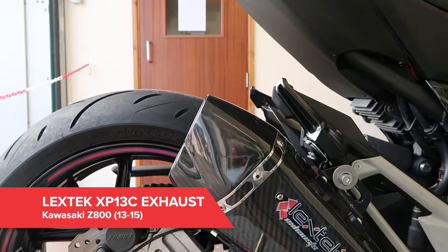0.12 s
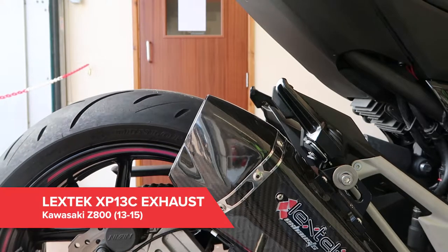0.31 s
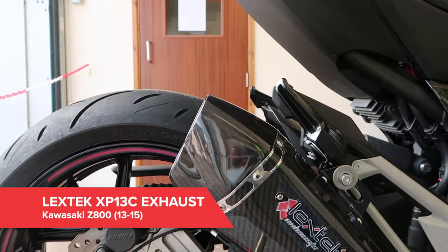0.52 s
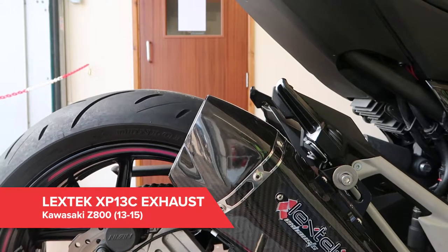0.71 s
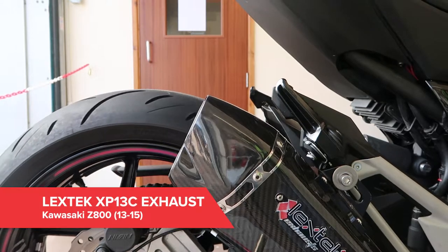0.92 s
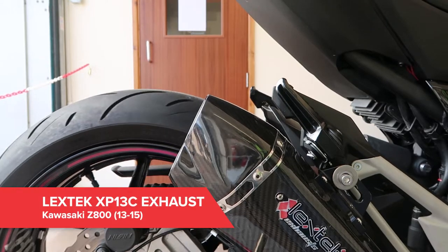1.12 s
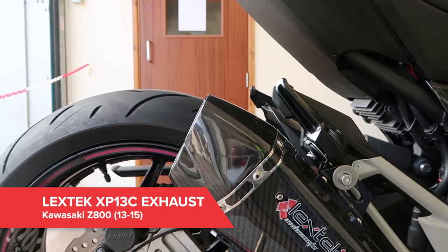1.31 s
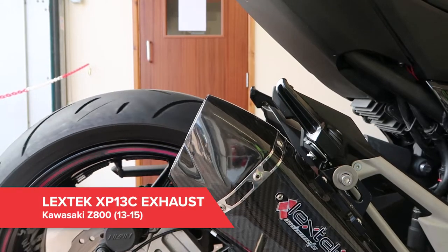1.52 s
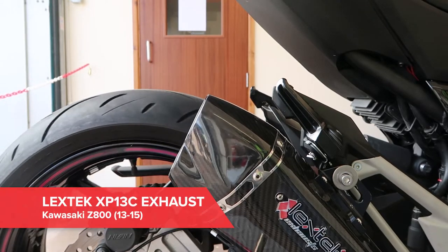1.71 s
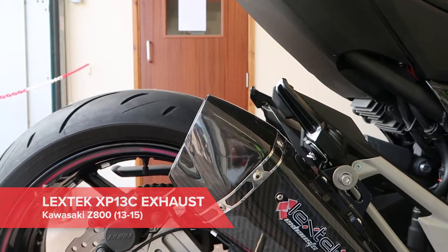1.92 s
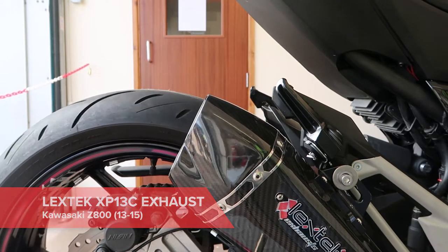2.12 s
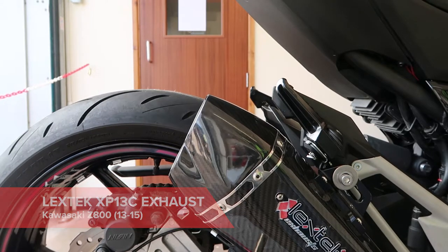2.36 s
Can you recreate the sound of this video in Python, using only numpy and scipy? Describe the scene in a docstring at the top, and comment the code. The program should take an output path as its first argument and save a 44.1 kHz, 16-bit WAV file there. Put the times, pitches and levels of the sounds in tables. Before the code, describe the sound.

A motorcycle engine idles with low, lumpy exhaust thumps in a workshop, then one quick blip cracks loudly, leaps to a raspy howl and glides back down to uneven idle, miked close to the silencer.

```python
"""A four-cylinder motorcycle lopes at idle in a workshop, heard close to its silencer, then gets one sharp blip.
Separate exhaust thumps are filtered impulses, one per firing; they swell, overload the microphone with bright
cracks (single filtered impulses) and merge into a note of harmonics and half orders. Impulses ringing resonances
make the burble, rasp, edge and shell ring; pulsing filtered noise is the rush of gas.
The throttle shuts and the note sinks smoothly back to an uneven idle, with one faint late knock."""
import sys
import numpy as np
from scipy import signal
from scipy.fft import rfft, irfft, next_fast_len
from scipy.io import wavfile

SR = 44100
rng = np.random.default_rng(int(sys.argv[2]) if len(sys.argv) > 2 else 0)


def output_pcm(signal):
    """Save a mono or channel-first signal as 16-bit PCM at the path in sys.argv[1].

    Samples are clipped to [-1, 1] before scaling.
    """
    pcm = np.clip(np.atleast_2d(signal).T, -1, 1) * 32767
    wavfile.write(sys.argv[1], SR, np.round(pcm).astype(np.int16))


N = 112455
TIME = np.arange(N) / SR
SIZE = next_fast_len(N + SR) // 2 * 2
HZ = np.maximum(np.arange(SIZE // 2 + 1) * SR / SIZE, 1)

# Layer levels are set before trims, scatter and room; colours are relative levels.
# engine speed as firing rate: [t/s, f/Hz]
SPEED = [(0.0, 53.09), (0.06, 53.22), (0.13, 45.12), (0.26, 51.36), (0.33, 43.31), (0.42, 48.79),
         (0.51, 44.87), (0.575, 45.47), (0.63, 70.27), (0.7, 115.58), (0.776, 199.08), (0.834, 262.13),
         (0.9, 331.17), (0.94, 356.16), (0.985, 368.28), (1.08, 335.31), (1.168, 308.39), (1.358, 256.41),
         (1.584, 200.2), (1.688, 174.11), (1.83, 145.08), (1.956, 120.06), (2.1, 96.03), (2.26, 80.57),
         (2.4, 63.72), (2.55, 53.41)]
# relative strength of the four cylinders, in firing order: [level/dB]
CYLINDER_DB = np.array([0.53, 0.44, 0.94, 0.021])

# strength of the exhaust thumps: [t/s, level/dB]
THUMP_LEVEL = [(0, -23), (.13, -27), (.33, -24), (.5, -20), (.585, -10), (.603, -4), (.62, -.5), (.66, -1),
               (.69, -4), (.715, -9), (.75, -15), (.82, -29), (.95, -34), (1, -27), (1.05, -48), (1.5, -52),
               (1.9, -40), (2.06, -29), (2.15, -23), (2.3, -24), (2.55, -23)]
# at idle the engine catches in runs of strong firings: [start t/s, length t/s, level/dB]
SURGES = [(.03, .054, -12.5), (.172, .118, -14), (.362, .1, -12.5), (.533, .06, -11), (2.128, .034, -11),
          (2.186, .012, -14), (2.222, .012, -9), (2.246, .024, -12.5), (2.338, .014, -16),
          (2.412, .048, -14.5), (2.514, .034, -15)]
# tone of the thumps: [f/Hz, level/dB]
THUMP_COLOUR = [(20, -36.5), (36, -15), (50, -6.5), (72, -11.5), (100, -6.5), (125, 4), (160, -4),
                (200, 2.5), (300, 6.5), (420, 5.5), (550, -4.5), (750, -30.5), (1000, -28), (1300, -59),
                (2500, -58.5), (8000, -92)]
THUMP_SCATTER_DB, THUMP_ROOM_DB = 1.5, -5
THUMP_LEAD_S, ECHO_S, ECHO_DB = .001, .0072, -11

# note at the firing rate: [t/s, rms level/dB]
FIRING_TONE = [(.62, -50), (.72, -29), (.79, -19), (.84, -21), (.9, -15), (.94, -18), (.965, -28), (1, -17),
               (1.03, -22), (1.08, -15), (1.11, -20), (1.15, -14.5), (1.24, -20), (1.3, -15), (1.35, -12),
               (1.41, -23), (1.46, -19), (1.51, -15), (1.61, -15), (1.69, -25), (1.74, -21), (1.8, -32),
               (1.85, -25), (1.95, -23.5), (2.05, -31), (2.15, -50)]
# its octave: [t/s, rms level/dB]
OCTAVE_TONE = [(.64, -42), (.7, -27), (.76, -21), (.805, -13), (.88, -22), (.96, -18), (1.02, -26),
               (1.08, -37), (1.14, -31), (1.2, -22), (1.27, -22), (1.35, -28), (1.43, -16), (1.48, -25),
               (1.55, -23), (1.6, -32), (1.645, -20), (1.71, -29), (1.79, -27), (1.85, -39), (1.9, -30),
               (1.97, -36), (2.03, -30), (2.2, -33), (2.26, -50)]
# third harmonic, singing out under throttle: [t/s, rms level/dB]
THIRD_TONE = [(.638, -38), (.68, -24), (.73, -19), (.765, -33), (.82, -21), (.87, -25), (.94, -24),
              (1, -50), (1.22, -48), (1.39, -30), (1.46, -31), (1.5, -42), (1.6, -28), (1.72, -29),
              (1.85, -35), (1.93, -48), (2.03, -30), (2.1, -37), (2.15, -23), (2.21, -28), (2.27, -46)]
# tones between the harmonics, from unequal cylinders: [multiple of the firing rate, level/dB]
HALF_ORDERS = [(.5, -15), (1.5, -9), (2.5, -10.5), (3.5, -17)]
# their shared swell: [t/s, rms level/dB]
HALF_LEVEL = [(.66, -36), (.8, -29), (.95, -28), (1.05, -31), (1.2, -25), (1.35, -27), (1.46, -25),
              (1.55, -22), (1.65, -26), (1.87, -23), (2.1, -39)]
# the silencer radiates the half orders poorly in the bass: [f/Hz, level/dB]
RADIATION = [(80, -45), (105, -14), (125, -6), (180, -7), (245, -6), (300, 6), (600, 6), (1000, 1)]
TONE_WAVER_DB, HALF_WAVER_DB, WAVERS_PER_S = 1, 3.5, 13.06
TREMBLE_DB, TREMBLE_CYCLES, TREMBLES_PER_S = .7, .013, 90
NOTE_LAG_CYCLES, NOTE_ROOM_DB, HALF_ROOM_DB = 0.19, -16, -0.5

# hollow burble of the silencer filling the room: [t/s, level/dB]
BURBLE_LEVEL = [(0, -34.5), (.13, -43.5), (.25, -36.5), (.35, -43), (.48, -35.5), (.57, -38.5),
                (.68, -20.5), (.78, -23), (.9, -33.5), (1, -41), (1.3, -33.5), (1.6, -39.5), (1.85, -32),
                (2.05, -30), (2.15, -28.5), (2.19, -35), (2.26, -31.5), (2.37, -39), (2.44, -34.5),
                (2.55, -41.5)]
# tone of the burble: [f/Hz, level/dB]
BURBLE_COLOUR = [(90, -25.5), (150, -10.5), (210, 1.5), (270, 3), (330, -0.5), (420, 0), (500, -5),
                 (600, -10), (750, -18.5), (1200, -48), (4000, -85.5)]
BURBLE_DB, BURBLE_SCATTER_DB, BURBLE_ROOM_DB = 0, 3.2, 3

# rasping overtones: [t/s, rms level/dB]
RASP_LEVEL = [(0, -51), (.15, -55), (.45, -44.5), (.57, -49.5), (.65, -22.5), (.72, -18), (.8, -16),
              (.94, -24.5), (1.02, -61.5), (1.1, -42), (1.18, -28), (1.3, -29.5), (1.55, -32), (1.78, -37),
              (1.95, -32.5), (2.08, -53), (2.15, -37), (2.27, -72), (2.36, -49.5), (2.55, -60.5)]
# tone of the rasp: [f/Hz, level/dB]
RASP_COLOUR = [(200, -66.5), (400, -17), (560, 7), (640, 5.5), (770, 15), (900, -5), (1060, 7.5),
               (1200, -25.5), (1600, -11), (3000, -48.5), (8000, -76.5)]
RASP_DB, RASP_SCATTER_DB, RASP_ROOM_DB, RASP_JITTER_S = -2.5, 2.8, -4, .00003

# metallic edge of the rasp: [t/s, rms level/dB]
EDGE_LEVEL = [(0, -63.5), (.58, -53.5), (.66, -43), (0.729, -32), (.8, -18.5), (.9, -23.5), (0.962, -29),
              (1.031, -89), (1.131, -39.5), (1.269, -34.5), (1.399, -40.5), (1.562, -38.5), (1.75, -49),
              (1.95, -55), (2.1, -72), (2.55, -73.5)]
# tone of the edge: [f/Hz, level/dB]
EDGE_COLOUR = [(600, -61.5), (1150, -14), (1350, 13.5), (1470, 3.5), (1580, 14.5), (1700, 7), (1830, 4.5),
               (2050, -2.5), (2300, -1), (2700, -18), (2930, 1), (3300, -8), (3700, -55.5), (3950, -15.5),
               (4500, -15), (7000, -35.5), (9000, -75.5)]
EDGE_DB, EDGE_SCATTER_DB = -6.5, 3.3

# narrow metallic ring of the silencer's shell: [t/s, level/dB]
RING_LEVEL = [(.55, -72.5), (.62, -57.5), (.72, -44.5), (.8, -37.5), (.94, -42.5), (1.04, -65), (1.13, -60),
              (1.2, -44), (1.35, -47), (1.6, -56.5), (1.85, -62), (2.1, -72.5)]
# tone of the ring: [f/Hz, level/dB]
RING_COLOUR = [(2000, -52.5), (2780, -18), (2880, 1), (2940, -2.5), (3050, -7.5), (3160, -16), (3700, -31),
               (3950, -13), (4200, -33.5), (6000, -59.5)]
RING_DB = 0

# continuous gas hiss: [t/s, rms level/dB]
HISS_LEVEL = [(0, -59.5), (.3, -58.5), (.55, -57), (.65, -43.5), (.8, -71.5), (0.999, -40), (1.1, -42),
              (1.319, -37), (1.46, -43), (1.559, -41.5), (1.82, -52), (1.9, -49.5), (2.05, -56.5),
              (2.25, -57.5), (2.55, -60)]
# tone of the hiss: [f/Hz, level/dB]
HISS_COLOUR = [(300, -8), (800, 3.5), (1200, 4), (1550, 2), (1950, -0.5), (2750, -2), (2930, -4),
               (3150, -4.5), (3600, -3), (3950, -2), (4300, -5), (5000, -5.5), (6200, -11.5), (7200, -19),
               (8000, -27), (10000, -42), (15000, -61)]
# gas blast under throttle: [t/s, rms level/dB]
BLAST_LEVEL = [(0.6, -83.5), (.7, -48), (0.798, -35.5), (0.881, -29.5), (0.941, -29), (0.999, -42.5),
               (1.059, -70.5)]
# tone of the blast: [f/Hz, level/dB]
BLAST_COLOUR = [(500, -16), (1000, 21.5), (1600, 2.5), (2100, 4.5), (2700, 6), (2930, 3.5), (3300, 9),
                (4500, 4.5), (5500, -1.5), (7200, -5.5), (7900, -34.5), (10000, -56.5), (15000, -69)]
# thin treble sizzle while the engine coasts: [t/s, rms level/dB]
SIZZLE_LEVEL = [(.6, -102), (.95, -70), (1.1, -64), (1.4, -66), (1.62, -59), (1.8, -82.5), (2.05, -102)]
# tone of the sizzle: [f/Hz, level/dB]
SIZZLE_COLOUR = [(4000, -38), (7000, 1), (8500, -3.5), (9700, -7.5), (11000, -23), (15000, -16.5)]
HISS_DB, BLAST_DB = -2.5, -1
HISS_PULSING = 0.13  # share of the jet's amplitude, ahead of its filter

# bright cracks as the loudest thumps overload the microphone, and one faint late knock: [t/s, level/dB]
CRACKS = [(.6348, -13), (.659, -6), (.6978, -16), (2.228, -25)]
# tone of the cracks and the knock: [f/Hz, level/dB]
CRACK_COLOUR = [(80, 3.5), (300, 0), (700, 0.5), (1100, -4), (1600, -11.5), (2500, -22.5), (4000, -32.5),
                (6000, -48), (11000, -55.5), (15000, -73.5)]
CRACK_ROOM_DB = -15

# stereo width, side against mid: [f/Hz, level/dB]
WIDTH = [(100, -55), (300, -35), (500, -25), (750, -16), (1000, -4), (1500, -2), (2000, 4.91), (2700, 6.72),
         (3000, 0.91), (3600, 6.7), (4400, 10.83), (5200, 3.87), (7000, 3.74), (9000, 12.83), (15000, 20)]
# share of the side's power that follows the mid: [f/Hz, share 0-1]
DIRECT_SHARE = [(500, 0.23), (1500, 0.92), (2300, 0.16), (5000, .1)]
SIDE_LAG_RAD, SPREAD_S = 0.57, 0.0059

ROOM_T60_S, ROOM_DELAY_S = 0.51, 0.0022
OVERLOAD = 1  # amplitude, full scale
CUTOFF_HZ = 15700


def from_db(db):
    """Decibels to gain."""
    return 10 ** (np.asarray(db) / 20)


def rms_one(x):
    """Scale to unit power."""
    return x / np.sqrt(np.mean(x ** 2) + 1e-20)


def in_time(rows, s=TIME):
    """Read a curve at the given times."""
    return np.interp(s, *np.transpose(rows))


def at_hz(rows, at=HZ):
    """Read a spectrum on a log-frequency axis."""
    hz, value = np.transpose(rows)
    return np.interp(np.log(at), np.log(hz), value)


def drift(rate):
    """Random wander between normal draws, at rate draws a second."""
    knots = rng.standard_normal(400)
    return np.interp(TIME * rate, np.arange(len(knots)), knots)


def response(colour):
    """Causal (minimum-phase) impulse response with this colour, peak 1."""
    cepstrum = irfft(np.log(from_db(at_hz(colour))))
    # folding the cepstrum forward in time gives minimum phase
    cepstrum[1:SIZE // 2] *= 2
    cepstrum[SIZE // 2 + 1:] = 0
    h = irfft(np.exp(rfft(cepstrum)))[:SR // 10]
    return h / np.abs(h).max()


def through(x, h):
    """Filter by an impulse response."""
    return signal.fftconvolve(x, h)[:N]


def workshop(x, room_db):
    """The walls return a diffuse tail: exponentially decaying noise after a short delay."""
    decay = from_db(-60 * TIME / ROOM_T60_S)
    tail = rng.standard_normal(N) * decay * (TIME > ROOM_DELAY_S)
    tail /= np.sqrt(np.sum(tail ** 2))
    return x + from_db(room_db) * through(x, tail)


def widen(mid):
    """The bass is central and the treble is spread wide, partly out of phase."""
    scatter = rfft(rng.standard_normal(N) * np.exp(-TIME / SPREAD_S), SIZE)
    scatter /= np.sqrt(np.mean(np.abs(scatter) ** 2))
    share = np.clip(at_hz(DIRECT_SHARE), 0, 1)
    direct = np.sqrt(share) * np.exp(-1j * SIDE_LAG_RAD)
    spread = direct + np.sqrt(1 - share) * scatter
    side = irfft(rfft(mid, SIZE) * from_db(at_hz(WIDTH)) * spread)[:N]
    return np.array([mid + side, mid - side])


def jet(phase, level, colour, gain_db):
    """Turbulent gas: noise pulsing with each firing, then coloured."""
    pulsing = 1 + HISS_PULSING * np.cos(2 * np.pi * phase)
    turbulence = rng.standard_normal(N) * pulsing
    return from_db(in_time(level) + gain_db) * rms_one(through(turbulence, response(colour)))


def gas(phase):
    """Continuous hiss, the blast under throttle and the thin sizzle, each a turbulent jet."""
    hiss = jet(phase, HISS_LEVEL, HISS_COLOUR, HISS_DB)
    blast = jet(phase, BLAST_LEVEL, BLAST_COLOUR, BLAST_DB)
    sizzle = jet(phase, SIZZLE_LEVEL, SIZZLE_COLOUR, HISS_DB)
    return hiss + blast + sizzle


def cracks():
    """Bright cracks of microphone overload and one faint late knock: single impulses, coloured."""
    s, db = np.transpose(CRACKS)
    clicks = np.bincount((s * SR).astype(int), from_db(db), N)
    return workshop(through(clicks, response(CRACK_COLOUR)), CRACK_ROOM_DB)


def puffs(s, db, scatter_db):
    """One impulse per firing, its strength varied by cylinder and by chance."""
    chance = scatter_db * rng.standard_normal(len(s))
    gain = from_db(db + np.resize(CYLINDER_DB, len(s)) + chance)
    # share each impulse between two samples to place it exactly
    at = np.clip(s * SR, 0, N - 2)
    i = at.astype(int)
    return np.bincount(i, gain * (1 - at + i), N) + np.bincount(i + 1, gain * (at - i), N)


def ringing(firings, level, colour, gain_db, scatter_db, room_db):
    """The steep fronts of the puffs excite resonances."""
    s = firings + RASP_JITTER_S * rng.standard_normal(len(firings))
    # denser firings are each made weaker, so the curve sets the rms level
    db = in_time(level, firings) + gain_db - 10 * np.log10(in_time(SPEED, firings) / SR)
    h = response(colour)
    h /= np.sqrt(np.sum(h ** 2))
    return workshop(through(puffs(s, db, scatter_db), h), room_db)


def shell_ring(firings):
    """The firings drive a narrow metallic resonance of the silencer's shell."""
    return ringing(firings, RING_LEVEL, RING_COLOUR, RING_DB, RASP_SCATTER_DB, RASP_ROOM_DB)


def burble(firings):
    """The silencer's low resonances fill the room with a hollow burble."""
    return ringing(firings, BURBLE_LEVEL, BURBLE_COLOUR, BURBLE_DB, BURBLE_SCATTER_DB, BURBLE_ROOM_DB)


def rasp(firings):
    """The pipe's resonances ring as overtones with a metallic edge above."""
    overtones = ringing(firings, RASP_LEVEL, RASP_COLOUR, RASP_DB, RASP_SCATTER_DB, RASP_ROOM_DB)
    edge = ringing(firings, EDGE_LEVEL, EDGE_COLOUR, EDGE_DB, EDGE_SCATTER_DB, RASP_ROOM_DB)
    return overtones + edge


def tone(phase, level, waver_db):
    """A partial locked to the engine, trembling with uneven combustion; silent outside its curve."""
    db = in_time(level) + waver_db * drift(WAVERS_PER_S) + TREMBLE_DB * drift(TREMBLES_PER_S)
    phase = phase + TREMBLE_CYCLES * drift(TREMBLES_PER_S)
    sounding = (TIME > level[0][0]) & (TIME < level[-1][0])
    return np.sqrt(2) * from_db(db) * np.cos(2 * np.pi * phase) * sounding


def exhaust_note(phase):
    """Firings merge into three harmonics; half orders swell and fade as they glide through room resonances."""
    harmonics = 0
    for k, level in enumerate((FIRING_TONE, OCTAVE_TONE, THIRD_TONE), 1):
        harmonics = harmonics + tone(k * phase, level, TONE_WAVER_DB)
    between = 0
    for multiple, db in HALF_ORDERS:
        gain = from_db(db + at_hz(RADIATION, multiple * in_time(SPEED)))
        between = between + gain * tone(multiple * phase + rng.random(), HALF_LEVEL, HALF_WAVER_DB)
    return workshop(harmonics, NOTE_ROOM_DB) + workshop(between, HALF_ROOM_DB)


def thumps(firings):
    """Each firing leaves the silencer as a push and a suck of air, and comes back once as a near echo."""
    db = in_time(THUMP_LEVEL, firings)
    for start, length, surge_db in SURGES:
        db = np.where((firings > start) & (firings < start + length), surge_db, db)
    pushes = puffs(firings - THUMP_LEAD_S, db, THUMP_SCATTER_DB)
    direct = through(pushes, response(THUMP_COLOUR))
    echo = from_db(ECHO_DB) * np.interp(TIME - ECHO_S, TIME, direct)
    return workshop(direct + echo, THUMP_ROOM_DB)


def scene():
    """The engine's speed times the firings, the note and the pulsing gas; the cracks have their own times."""
    phase = np.cumsum(in_time(SPEED)) / SR  # counted in firings
    firings = np.interp(np.arange(int(phase[-1]) + 1), phase, TIME)  # time of each firing, s
    resonances = shell_ring(firings) + burble(firings) + rasp(firings)
    exhaust = exhaust_note(phase - NOTE_LAG_CYCLES) + thumps(firings)
    return widen(gas(phase) + cracks() + resonances + exhaust)


def record(dry):
    """The loudest thumps are rounded off by overload; the top is cut."""
    rounded = dry / (1 + (dry / OVERLOAD) ** 16) ** (1 / 16)
    top_cut = signal.cheby2(12, 70, CUTOFF_HZ, fs=SR, output="sos")
    return signal.sosfilt(top_cut, rounded)


dry = scene()
out = record(dry)
output_pcm(out)
```